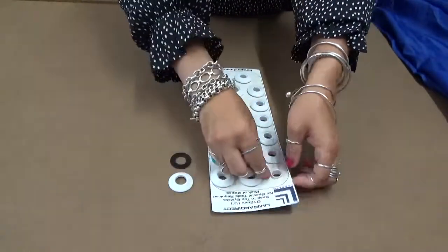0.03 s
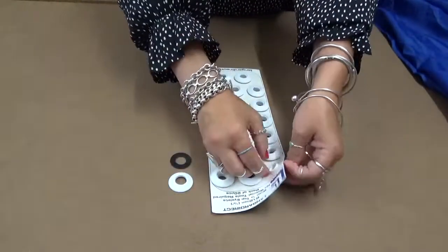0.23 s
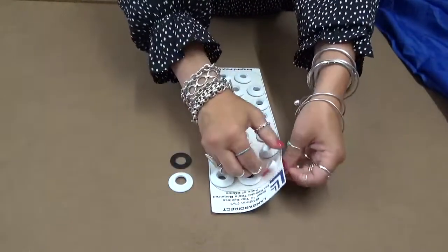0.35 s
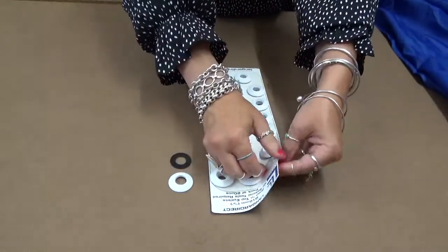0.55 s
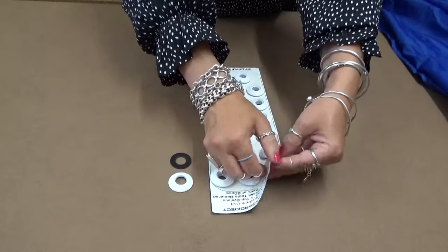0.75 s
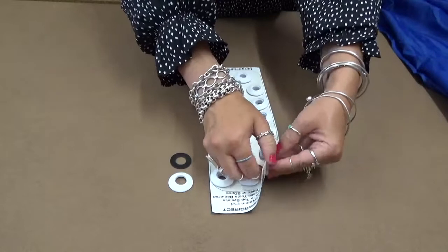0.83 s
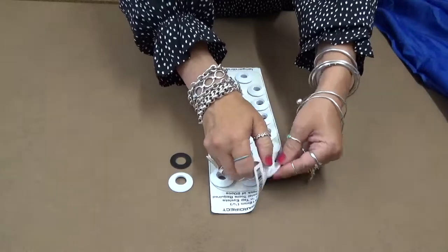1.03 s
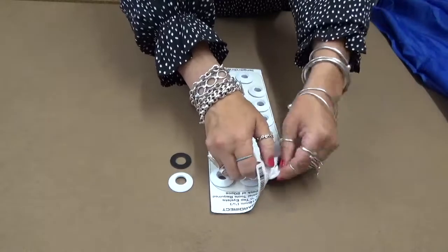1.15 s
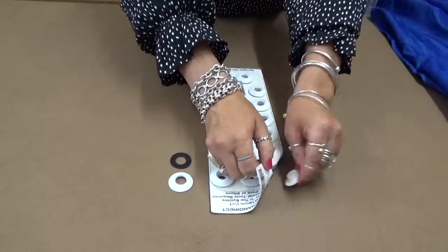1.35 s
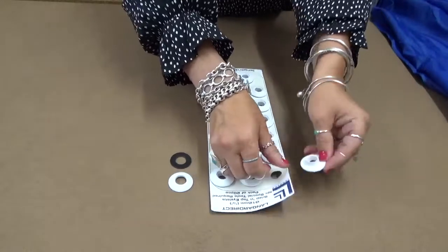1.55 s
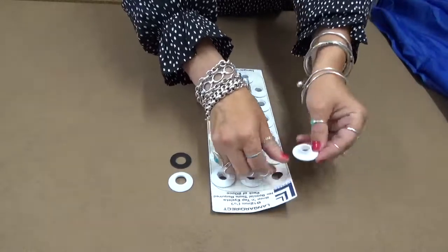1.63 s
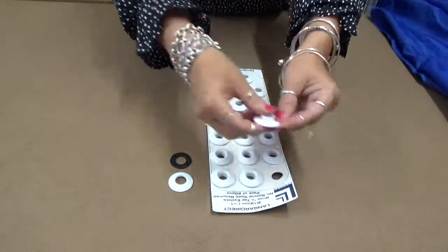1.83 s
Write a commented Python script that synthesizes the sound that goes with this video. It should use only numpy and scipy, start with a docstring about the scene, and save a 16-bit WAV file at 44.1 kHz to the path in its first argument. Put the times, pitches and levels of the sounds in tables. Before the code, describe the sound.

A stiff plastic sheet cracks, scrapes and snaps as a small ring is broken out.

```python
"""Breaking a ring out of a plastic sheet

Fingers bend a stiff sheet on a table. A bridge of plastic cracks, the small ring's edge scrapes and
tears along the sheet in stick-slip bursts, then the freed sheet buckles and flaps back. Each impact
is a pulse, most followed by damped modes. Bracelets chink; the room adds a short echo, hum and hiss."""
import sys
import numpy as np
from scipy import signal
from scipy.fft import rfft, irfft
from scipy.io import wavfile
from scipy.ndimage import uniform_filter1d

SR = 44100
rng = np.random.default_rng(int(sys.argv[2]) if len(sys.argv) > 2 else 0)


def transcribe(u):
    """Save the signal u as a 16-bit wav file named by the first command-line argument.

    u: samples, shape (n,) or (channels, n), limited to [-1, 1]; the rate is SR.
    q: integer samples, one column per channel.
    """
    v = np.clip(np.atleast_2d(u).T, -1, 1)
    q = np.round(v * 32767).astype(np.int16)
    wavfile.write(sys.argv[1], SR, q)


N = 83790
LOWEST_HZ, TOP_HZ = 136, 11000  # the sound thins out below the first; the band ends at the second


def undb(db):
    """Decibels express an amplitude ratio on a logarithmic scale."""
    return 10 ** (np.asarray(db) / 20)


def curve(table, hz):
    """Interpolation on a logarithmic frequency axis gives a table's value between its rows."""
    table_hz, values = np.array(table, float).T
    return np.interp(np.log(np.maximum(hz, 1)), np.log(table_hz), values)


def shape(x, colour):
    """Filtering multiplies a signal's spectrum by a gain curve."""
    hz = np.fft.rfftfreq(len(x), 1 / SR)
    return irfft(rfft(x) * undb(curve(colour, hz)), len(x))


def whiten(x, width_hz):
    """Spectral whitening levels out chance humps broader than the given width."""
    spectrum = rfft(x, 2 * len(x))
    bins = max(int(width_hz * 2 * len(x) / SR), 1)
    power = uniform_filter1d(np.abs(spectrum) ** 2, bins)
    return irfft(spectrum * np.sqrt(power.mean() / power))[:len(x)]


def click(colour, bass_hz=None, treble_hz=None, size=1024):
    """A minimum-phase pulse is the most compact causal one with a given spectrum; its peak is 1."""
    hz = np.maximum(np.fft.rfftfreq(size, 1 / SR), 20)
    gain = undb(curve(colour, hz)) / np.sqrt(1 + (hz / TOP_HZ) ** 20) / np.hypot(1, (LOWEST_HZ / hz) ** 2)
    if bass_hz:
        high_pass = hz / np.hypot(hz, bass_hz)
        low_pass = 1 / np.hypot(1, (hz / treble_hz) ** 4)
        gain *= high_pass * np.hypot(low_pass, undb(-16.5))  # some treble remains above the corner
    cepstrum = irfft(np.log(gain))[:size // 2]
    cepstrum[0] /= 2
    pulse = irfft(np.exp(rfft(2 * cepstrum, size)))
    return pulse / np.abs(pulse).max()


def resonate(modes, waver=0, waver_s=0.011):
    """Free vibration is a sum of damped modes; their pitch wavers by a fraction if the part flexes."""
    t = np.arange(SR // 4) / SR
    out = np.zeros(len(t))
    for hz, db, t60 in modes:
        drift = np.interp(t / waver_s, np.arange(256), rng.standard_normal(256))
        cycles = hz * (t + waver * np.cumsum(drift) / SR)
        out += undb(db - 60 * t / t60) * np.sin(2 * np.pi * cycles)
    return out


def flutter(pulse, tail_db, t60):
    """Bending waves run about in the plastic, giving a pulse a diffuse tail that dies quickly."""
    t = np.arange(SR // 10) / SR
    response = rng.standard_normal(len(t)) * undb(-60 * t / t60) * (t > 1 / 4000)
    response *= undb(tail_db) / np.linalg.norm(response)
    response[0] = 1  # the direct pulse
    return signal.fftconvolve(whiten(response, width_hz=310), pulse)


def disperse(x, delay_at_1khz_s=0.000572):
    """Dispersion: bending waves carry the treble to the edge first, so a click becomes a falling chirp."""
    hz = np.fft.rfftfreq(len(x), 1 / SR)
    phase_lag = 4 * np.pi * delay_at_1khz_s * np.sqrt(1000 * hz)
    return irfft(rfft(x) * np.exp(-1j * phase_lag), len(x))


def add(out, start, sound):
    """Superposition: a sound adds to the mix from its start in seconds."""
    i = max(int(round(start * SR)), 0)
    out[i:i + len(sound)] += sound[:max(N - i, 0)]


# Spectrum of the room noise. Each row: frequency in Hz, relative spectral density in dB.
AIR_COLOUR = [(22, -16), (40, -8), (62, -11), (85, -4.5), (135, -12), (210, -5), (330, -7), (600, -8),
              (850, -14.5), (1500, -19.5), (2500, -23), (4000, -24.5), (11000, -29)]
# Its stereo width. Each row: frequency in Hz, side level against mid in dB.
AIR_WIDTH = [(50, -19.5), (250, -17.5), (1000, -5), (4000, -4), (11000, -16.5)]

def air(noise_db=-54.5, hum_hz=49.4, hum_db=-63):
    """The noise floor of the room is steady broadband noise plus one low tone."""
    mid, side = (shape(white, AIR_COLOUR) for white in rng.standard_normal((2, N)))
    stereo = mid + np.array([[1], [-1]]) * shape(side, AIR_WIDTH)
    hum = np.sqrt(2) * np.sin(2 * np.pi * (hum_hz * np.arange(N) / SR + rng.random()))
    return undb(noise_db) * stereo / mid.std() + undb(hum_db) * hum


# Decay of the room. Each row: frequency in Hz, reverberation time in seconds.
ROOM_DECAY = [(200, 0.43), (800, 0.23), (2100, 0.25), (5500, 0.23), (11000, 0.28)]
# Spectrum of the echo. Each row: frequency in Hz, gain in dB.
ECHO_COLOUR = [(100, -0.5), (220, 3.5), (450, 3), (1000, 4.5), (3000, -2), (5000, -4.5), (7500, -3.5),
               (11000, -10)]
# Its stereo width. Each row: frequency in Hz, side level against mid in dB.
ECHO_WIDTH = [(200, -24), (500, -28), (1200, -10.5), (3000, -5), (9000, -8.5)]

def room(onset_s=0.0034):
    """Reverberation: dense reflections build up and decay exponentially, the bass lasting longest."""
    t = np.arange(SR // 2) / SR
    hz = np.fft.rfftfreq(len(t), 1 / SR)
    build_up = 1 - np.exp(-(t / onset_s) ** 2)
    tails = []
    for noise in rng.standard_normal((2, len(t))):
        tail = np.zeros(len(t))
        for centre_hz, t60 in ROOM_DECAY:
            band = curve([(f, f == centre_hz) for f, _ in ROOM_DECAY], hz)
            tail += irfft(rfft(noise) * band, len(t)) * undb(-60 * t / t60)
        tail = signal.fftconvolve(whiten(tail, width_hz=77) * build_up, click(ECHO_COLOUR))
        tails.append(tail / np.linalg.norm(tail))
    mid, side = tails
    return mid + np.array([[1], [-1]]) * shape(side, ECHO_WIDTH)


# Bracelets touch as the hands shift. Each row: start in seconds, level in dB.
BRACELET_CHINKS = [(0.1400, -43.5), (0.4360, -45.5), (0.589, -45), (0.594, -42.5), (0.603, -49),
                   (0.717, -46), (1.0625, -43), (1.065, -45.5)]
# Modes of a link. Each row: frequency in Hz, level in dB, time to fall 60 dB in seconds.
LINK_MODES = [(3900, -11.5, 0.02), (6010, -6, 0.021), (6300, -10.5, 0.037), (8500, -9.5, 0.028),
              (9830, -6.5, 0.032), (10840, -11, 0.022)]

def chinks(pitch_spread=0.019):
    """Metal links ring at slightly different natural frequencies, damped by the wrist."""
    out = np.zeros(N)
    detunings = 1 + pitch_spread * rng.standard_normal((len(BRACELET_CHINKS), len(LINK_MODES)))
    for (start, db), ratios in zip(BRACELET_CHINKS, detunings):
        modes = [(hz * ratio, level, t60) for (hz, level, t60), ratio in zip(LINK_MODES, ratios)]
        add(out, start, undb(db) * resonate(modes, waver=0.0314))  # jostling blurs the pitch
    return out


# Fingertips knock the sheet against the table. Each row: start in seconds, level in dB.
SHEET_KNOCKS = [(0.027, -47), (0.4250, -43), (0.556, -52), (0.717, -44), (1.0527, -36.5)]
# Spectrum of a knock. Each row: frequency in Hz, gain in dB.
KNOCK_SPECTRUM = [(100, -15), (600, -2.5), (1100, 0), (1600, -1), (2500, -5), (4000, -18), (11000, -45)]
# Modes of the held sheet. Each row: frequency in Hz, level in dB, time to fall 60 dB in seconds.
HELD_MODES = [(830, -26, 0.076), (1128, -3, 0.055), (1533, -14, 0.041)]

def knocks():
    """A soft impact carries little treble; the held sheet's damped modes give it a slight pitch."""
    out = np.zeros(N)
    for start, db in SHEET_KNOCKS:
        add(out, start, undb(db) * flutter(click(KNOCK_SPECTRUM), tail_db=3.5, t60=0.011))
        add(out, start, undb(db) * resonate(HELD_MODES))
    return out


# Ticks of the ring's edge and fingernails. Each row: start in seconds, level in dB, centre in Hz.
EDGE_TICKS = [(0.0163, -33, 3840), (0.02, -26, 3900), (0.1902, -28, 3150), (0.2081, -22, 8900),
              (0.2097, -33, 2720), (0.2205, -14.5, 7400), (0.446, -33.5, 7040), (0.7835, -37, 7800),
              (0.7938, -35.5, 3800), (0.7999, -28, 8800), (0.8940, -43, 3400), (1.0026, -28.5, 7600),
              (1.018, -33, 7000), (1.195, -28, 8400), (1.2267, -26, 3000), (1.2380, -18, 9100),
              (1.4910, -16, 10000), (1.4989, -19, 7000), (1.533, -24, 7360), (1.6027, -24.5, 3700)]

def ticks(skirt_ratio=1.42, skirt_db=-9):
    """Tiny contacts hardly ring, so each has one broad spectral peak about its own frequency."""
    out = np.zeros(N)
    for start, db, hz in EDGE_TICKS:
        colour = [(LOWEST_HZ, -24), (hz / skirt_ratio, skirt_db), (hz, 0), (hz * skirt_ratio, skirt_db)]
        add(out, start, undb(db) * flutter(click(colour), tail_db=-6, t60=0.0059))
    return out


def grains(spread_db, bands=11, band_slips_per_s=2500):
    """Shot noise: tiny slips occur at random, each sounding in one of several overlapping bands."""
    band_position = np.linspace(0, bands - 1, N // 2 + 1)
    out = np.zeros(N)
    for k in range(bands):
        slips = (rng.random(N) < band_slips_per_s / SR) * rng.choice([-1, 1], N)
        strengths = undb(spread_db * rng.standard_normal(N))
        band = np.cos(np.pi / 2 * np.minimum(np.abs(band_position - k), 1))
        out += irfft(rfft(slips * strengths) * band, N)
    return out / out.std()


# Plastic scrapes on plastic, and skin rubs in the long, faint swells. Each row: release in seconds, swell time
# in seconds, rms level in dB.
SCRAPES_AND_RUBS = [(0.012, 0.007, -46), (0.135, 0.17, -57.5), (0.198, 0.027, -48.5), (0.210, 0.011, -42),
                    (0.223, 0.024, -43.5), (0.385, 0.06, -55), (0.447, 0.079, -60), (0.606, 0.018, -49.5),
                    (0.74, 0.093, -64), (0.803, 0.038, -52.5), (0.817, 0.021, -53), (0.847, 0.014, -52.5),
                    (0.974, 0.02, -53), (1.0075, 0.0043, -46), (1.018, 0.028, -46), (1.125, 0.028, -56),
                    (1.178, 0.039, -53.5), (1.212, 0.044, -48), (1.2265, 0.0038, -38.5), (1.240, 0.018, -36.5),
                    (1.512, 0.018, -51), (1.865, 0.039, -57.5)]
# Spectrum of a scrape. Each row: frequency in Hz, gain in dB.
SCRAPE_SPECTRUM = [(200, -26.5), (1200, -9.5), (2200, -5.5), (3100, 2), (4800, -4.5), (6500, -2),
                   (9500, -0.5), (11000, -6)]
# The last bridge tears. Each row: release in seconds, swell time in seconds, rms level in dB.
BRIDGE_TEARS = [(1.4865, 0.0032, -29), (1.4915, 0.0046, -19)]
# Spectrum of a tear. Each row: frequency in Hz, gain in dB.
TEAR_SPECTRUM = [(200, -11), (4000, -17), (5300, -5), (6400, 0.5), (7200, -5), (8000, 0.5), (9100, -3),
                 (9900, 2.5), (11000, -1)]

def friction(bursts, colour, spread_db, release_s=0.0012):
    """Stick-slip friction: dense grains swell with the pull and stop when the edge lets go."""
    t = np.arange(N) / SR
    power = np.zeros(N)
    for release, swell_s, db in bursts:
        rise = (t - release) / swell_s
        log_envelope = np.where(t < release, rise * np.hypot(1, rise), (release - t) / release_s)
        power += (undb(db) * np.exp(log_envelope)) ** 2
    pulse = click(colour)
    return signal.fftconvolve(grains(spread_db) * np.sqrt(power), pulse / np.linalg.norm(pulse))[:N]


# The released sheet slaps the table. Each row: start in seconds, level in dB.
TABLE_SLAPS = [(1.5193, -21), (1.5316, -23.5), (1.5348, -22.5), (1.5929, -30)]
# Spectrum of a slap. Each row: frequency in Hz, gain in dB.
SLAP_SPECTRUM = [(60, -27), (200, -1), (600, -7), (1500, -1.5), (3000, -6), (11000, -36.5)]
# Modes a slap excites. Each row: frequency in Hz, level in dB, time to fall 60 dB in seconds.
SLAP_RESONANCES = [(212.5, -23.5, 0.33), (283, -24, 0.12), (434, -27, 0.16), (629, -27, 0.065),
                   (671, -26, 0.084)]

def slaps():
    """Elastic recoil throws the sheet against the table, and the impact excites low modes."""
    out = np.zeros(N)
    for start, db in TABLE_SLAPS:
        add(out, start, undb(db) * flutter(click(SLAP_SPECTRUM), tail_db=0, t60=0.033))
        add(out, start, undb(db) * resonate(SLAP_RESONANCES))
    return out


# The sheet buckles. Each row: start in seconds, level in dB, bass corner in Hz, treble corner in Hz.
BUCKLING_POPS = [(1.3242, -38.5, 1500, 3900), (1.3490, -24.5, 786, 2170), (1.3676, -24.5, 1100, 3800),
                 (1.3894, -29.5, 590, 2370), (1.4438, -27.5, 900, 3020), (1.4627, -30.5, 400, 2200),
                 (1.4669, -25, 600, 2500), (1.4682, -24.5, 1200, 7300), (1.4790, -28.5, 496, 2300),
                 (1.5055, -29, 400, 3380), (1.5159, -10.5, 710, 9100), (1.5185, -6, 606, 8700),
                 (1.52, -15.5, 312, 3780), (1.5229, -11, 587, 6660), (1.5240, -31.5, 500, 3200),
                 (1.5723, -23, 710, 4060), (1.615, -10.5, 1520, 5430), (1.6166, -21.5, 2230, 4700),
                 (1.6185, -28.5, 503, 3360)]
# Spectrum of a pop. Each row: frequency in Hz, gain in dB.
POP_SPECTRUM = [(80, -6.5), (220, 3.5), (600, 0), (800, -2.5), (1100, 1.5), (1450, -2), (1950, -0.5),
                (2500, -4), (3100, 0.5), (3900, -2), (4700, -5), (5500, -9.5), (7800, -5.5), (11000, -14.5)]
# Modes of the bent sheet. Each row: frequency in Hz, level in dB, time to fall 60 dB in seconds.
BENT_MODES = [(996, -39, .15), (1020, -45, 0.12), (1243, -30, 0.061), (1735, -42, 0.16), (1950, -40, 0.14),
              (2960, -41, 0.071), (2990, -22.5, 0.04), (3800, -28, 0.045)]

def pops():
    """Snap-through buckling flips the sheet's shape; gentle flips are duller, small ones thinner."""
    out = np.zeros(N)
    for start, db, bass_hz, treble_hz in BUCKLING_POPS:
        pulse = click(POP_SPECTRUM, bass_hz, treble_hz)
        modes = [(hz, level - 10 * np.log10(1 + (hz / treble_hz) ** 2), t60)
                 for hz, level, t60 in BENT_MODES]
        add(out, start, undb(db) * flutter(pulse, tail_db=2, t60=0.017))
        add(out, start, undb(db) * resonate(modes, waver=0.016))
    return disperse(out)


# The plastic bridge breaks. Each row: start in seconds, level in dB.
BRIDGE_CRACKS = [(0.2413, -4.5), (0.2439, -3.5), (0.246, -6.5), (0.2471, -19)]
# Spectrum of a crack. Each row: frequency in Hz, gain in dB.
CRACK_SPECTRUM = [(100, -40), (300, -20), (1000, -25), (1400, -13), (1850, 0.5), (2250, -5.5), (2800, 3.5),
                  (3900, -3.5), (5000, 4), (5700, -2), (6300, 0), (7200, -6.5), (9600, -3.5),
                  (11000, -13.5)]
# Modes of the small ring. Each row: frequency in Hz, level in dB, time to fall 60 dB in seconds.
SMALL_RING_MODES = [(227.4, -41, 0.37), (1610, -54, 0.22), (1837, -48, .2), (2778, -50, 0.15),
                    (3030, -59, 0.11), (3980, -38, 0.084), (4400, -44, 0.17), (4744, -48, 0.11),
                    (5170, -51, 0.078), (6013, -42, .1)]

def cracks():
    """Fracture releases the bridge's strain in quick steps, each exciting the modes of the ring."""
    out = np.zeros(N)
    for start, db in BRIDGE_CRACKS:
        add(out, start, undb(db) * flutter(click(CRACK_SPECTRUM), tail_db=-3.5, t60=0.012))
        add(out, start, undb(db) * resonate(SMALL_RING_MODES, waver=0.0037))
    return disperse(out)


def place(x, echo, left_db, room_db):
    """A level difference between channels locates the direct sound; convolution adds the room's echo."""
    direct = x * undb(np.array([[left_db], [-left_db]]) / 2)
    return direct + undb(room_db) * signal.fftconvolve(x[None], echo, axes=1)[:, :N]


def scene():
    """All sources share one room and add linearly over its noise floor."""
    echo = room()
    return (place(cracks(), echo, left_db=-2.0, room_db=-13.0)
            + place(pops(), echo, left_db=-1.5, room_db=-13.5)
            + place(slaps(), echo, left_db=1.0, room_db=-6.5)
            + place(ticks(), echo, left_db=2.5, room_db=-13.5)
            + place(knocks(), echo, left_db=0.5, room_db=-14.5)
            + place(chinks(), echo, left_db=2.5, room_db=-6.0)
            + place(friction(SCRAPES_AND_RUBS, SCRAPE_SPECTRUM, spread_db=5), echo, left_db=-2.4, room_db=-13)
            + place(friction(BRIDGE_TEARS, TEAR_SPECTRUM, spread_db=2.5), echo, left_db=1, room_db=-19.5)
            + air())


def record(dry):
    """Band limiting: a steep low-pass filter removes the top octave."""
    low_pass = signal.firwin(121, TOP_HZ + 50, fs=SR, window=("kaiser", 4))
    return signal.fftconvolve(dry, low_pass[None], mode="same", axes=1)


dry = scene()
out = record(dry)
transcribe(out)
```